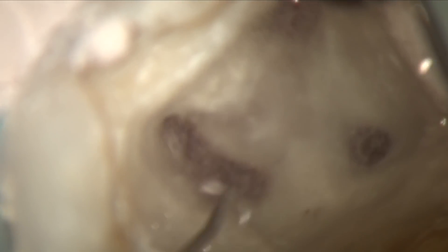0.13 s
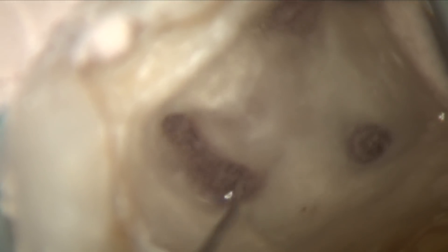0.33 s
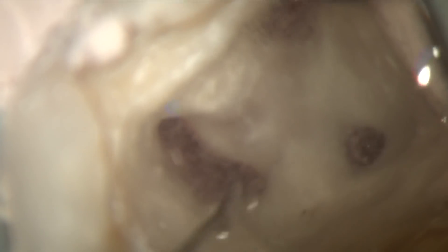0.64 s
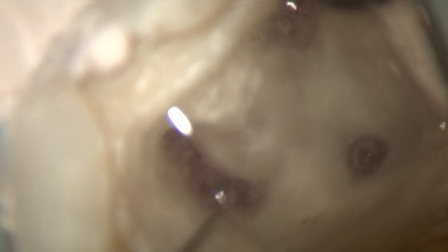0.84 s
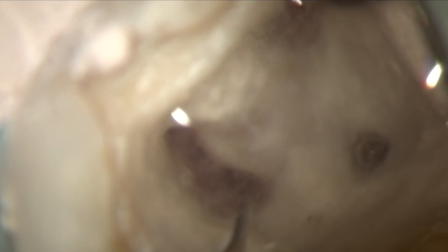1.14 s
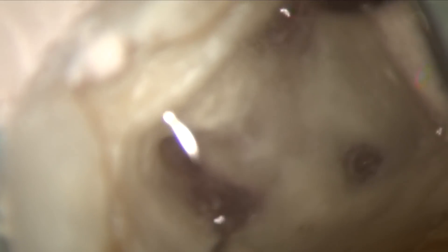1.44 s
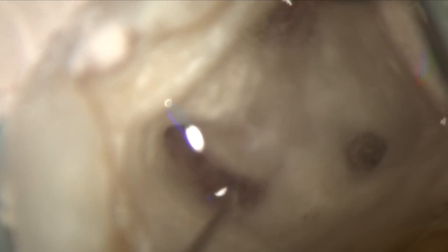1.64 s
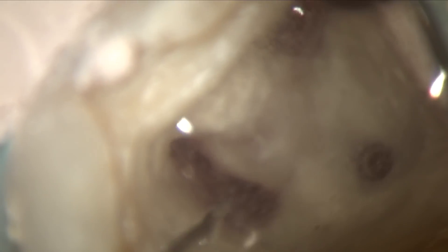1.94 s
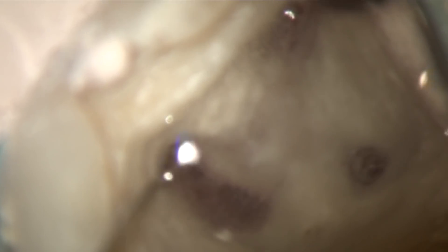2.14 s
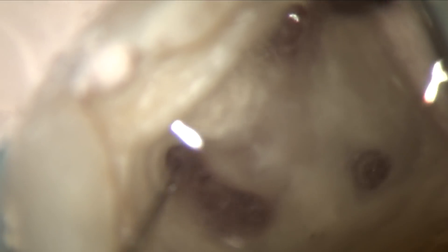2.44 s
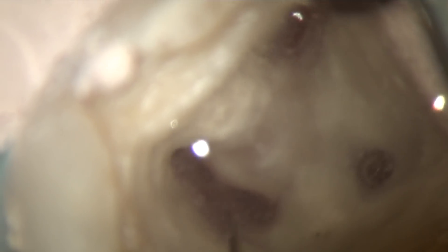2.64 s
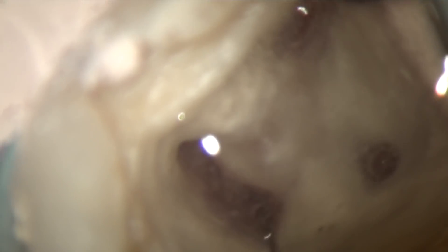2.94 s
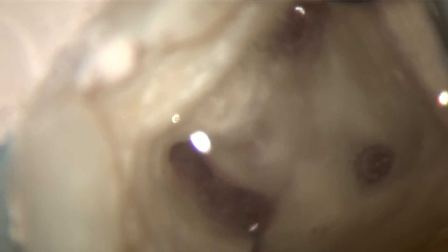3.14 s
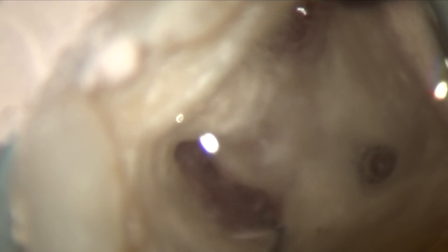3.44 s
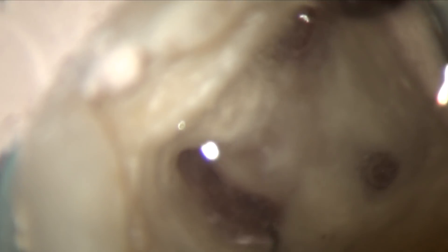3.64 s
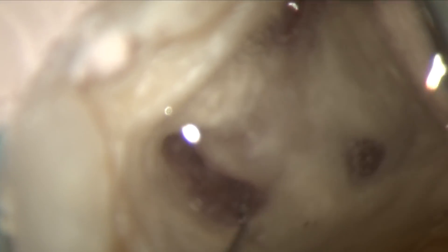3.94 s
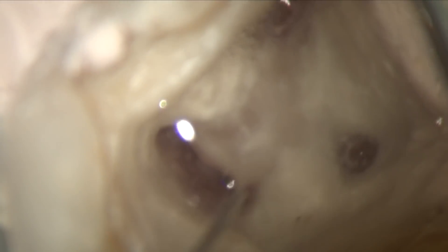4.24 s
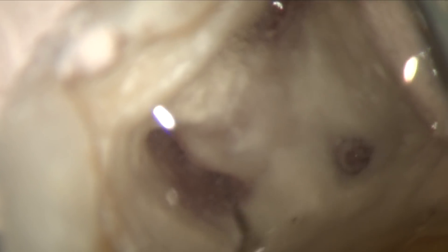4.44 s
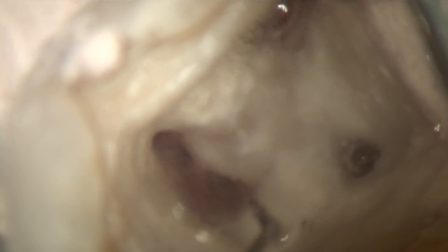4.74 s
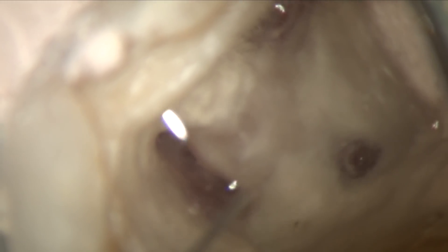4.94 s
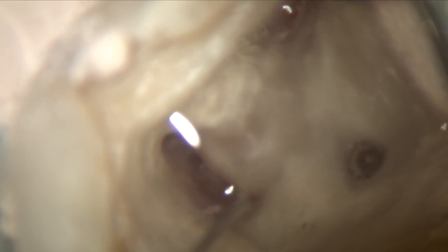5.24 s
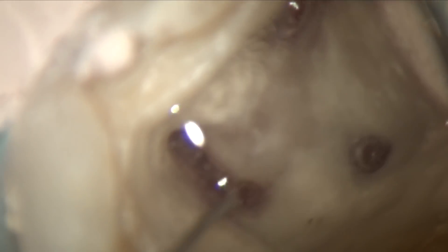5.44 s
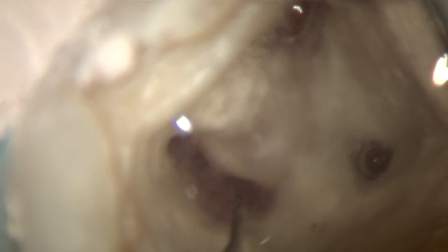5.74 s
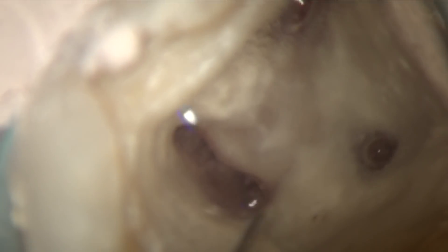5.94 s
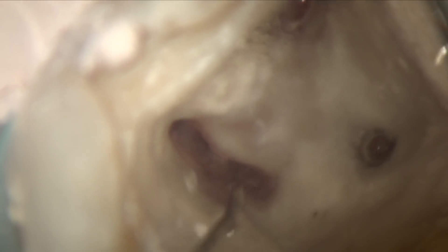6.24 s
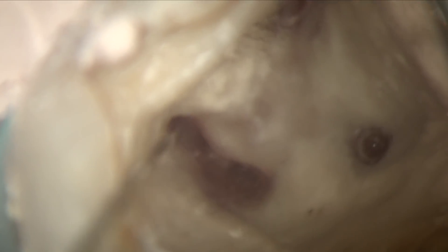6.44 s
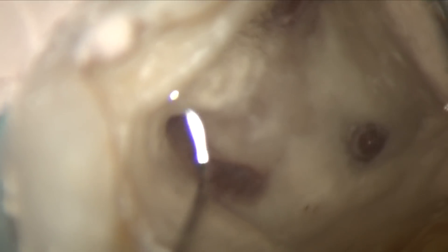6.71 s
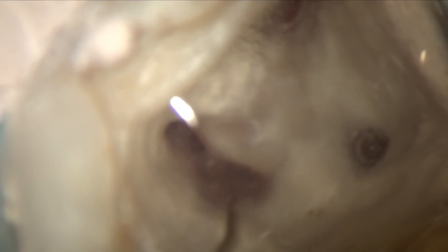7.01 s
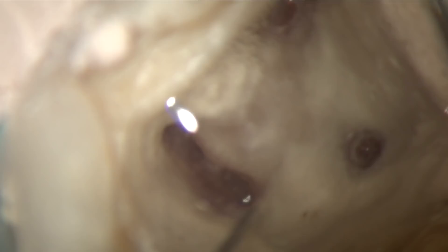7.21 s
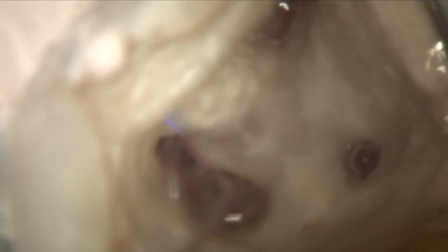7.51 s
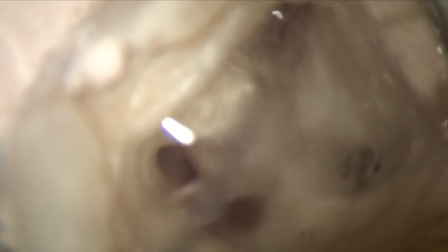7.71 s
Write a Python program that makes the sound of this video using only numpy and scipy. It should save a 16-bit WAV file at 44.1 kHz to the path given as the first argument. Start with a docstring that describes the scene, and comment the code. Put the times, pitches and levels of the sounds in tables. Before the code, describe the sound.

Steady bright suction hiss over faint pump whine, small wet rubs, a brief squeak, then a hard click that makes the level drop abruptly.

```python
"""A small treatment room: a thin suction tube draws air and a little liquid close to two microphones.
Jet noise at the tip excites the resonances of tube and cavity; a low rumble of air in the hose and
the faint sinusoids of a pump lie below it. Bursts of filtered noise make wet scuffs, gliding tones
low hums and a squeak, damped modes two dull bumps and one sharp tap.
The tap overloads the recorder, which steps its gain down and lets it creep back."""
import sys
import numpy as np
from scipy import signal
from scipy.fft import rfft, irfft
from scipy.io import wavfile

SR = 44100
rng = np.random.default_rng(int(sys.argv[2]) if len(sys.argv) > 2 else 0)


def pcm_store(signal):
    """Save signal as 16-bit PCM."""
    levels = np.round(np.clip(np.atleast_2d(signal), -1, 1) * 32767)
    wavfile.write(sys.argv[1], SR, levels.astype(np.int16).T)


def boost_factor(decibels):
    """Convert a level in decibels to a linear amplitude factor."""
    exponent = np.asarray(decibels, float) / 20
    return 10 ** exponent


N = 347067   # samples


def rms_one(x):
    """Normalisation: scale a signal to unit rms."""
    return x / np.sqrt(np.mean(x ** 2) + 1e-20)


def on_fft_grid(points):
    """Frequency response: interpolate (hz, db) points over log frequency at every FFT bin."""
    hz = np.maximum(np.fft.rfftfreq(N, 1 / SR), 1)
    point_hz, point_db = np.transpose(points)
    return np.interp(np.log(hz), np.log(point_hz), point_db)


def in_time(rows):
    """Envelope: interpolate every column after the first, which is time in s, at every sample."""
    s, *columns = np.transpose(rows)
    return [np.interp(np.arange(N) / SR, s, column) for column in columns]


def drift(rate_hz):
    """Slow random modulation of unit rms: white noise through two equal low-pass poles at rate_hz."""
    hop = 40   # samples between computed values
    r = np.exp(-2 * np.pi * rate_hz * hop / SR)
    white = rng.standard_normal(N // hop + 2002)
    slow = signal.lfilter([1], [1, -2 * r, r * r], white)[2000:]   # without the filter's start
    return np.interp(np.arange(N) / hop, np.arange(len(slow)), rms_one(slow))


def resonate(x, hz, width_hz):
    """Resonance: two equal band-pass sections, unit gain at the peak, give steep skirts and dark valleys."""
    r = np.exp(-np.pi * width_hz / SR)
    section = [(1 - r * r) / 2, 0, (r * r - 1) / 2, 1, -2 * r * np.cos(2 * np.pi * hz / SR), r * r]
    return signal.sosfilt([section, section], x)


def add_rub(out, start_s, length_s, hz, width_hz, level_db, fall=0):
    """Friction noise: adds a resonant, uneven burst; slowing its playback lowers the pitch."""
    spatter = rng.standard_normal(SR // 2) * boost_factor(3.5 * drift(70.0)[:SR // 2])   # wet and uneven
    rub = resonate(spatter, hz, width_hz)[::-1]
    i, n = int(start_s * SR), int(length_s * SR)
    position = np.cumsum(np.linspace(1 + fall / 2, 1 - fall / 2, n))
    rub = np.interp(position, np.arange(len(rub)), rub)
    out[i:i + n] += boost_factor(level_db) * rms_one(rub) * np.hanning(n) ** .5


def room():
    """Reverberation: response of the direct sound plus a dull, exponentially decaying tail of reflections."""
    tail_db, t60_s, wall_cut_hz = -16, 0.38, 1330   # tail energy against the direct sound
    t = np.arange(SR // 2) / SR
    pole = np.exp(-2 * np.pi * wall_cut_hz / SR)
    tail = signal.lfilter([1], [1, -pole], rng.standard_normal(len(t)))
    tail = tail * boost_factor(-60 * t / t60_s) * (t > .004)   # walls close by: the tail begins after 4 ms
    return 1 + boost_factor(tail_db) * rfft(tail / np.sqrt(np.sum(tail ** 2)), N)


def pump():
    """Periodic machine excitation: thin sinusoids carried along the hose, wavering in speed and strength."""
    # lines of the pump's whine: pitch_hz
    line_hz = [316, 632, 993, 1408, 1789, 1987]
    # their strengths: peak_db (against the hiss rms, before wavering)
    line_db = [-32, -41.5, -39, -40, -39, -37]
    out = 0
    for hz, level_db in zip(line_hz, line_db):
        phase = 2 * np.pi * np.cumsum(hz * (1 + .0012 * drift(2.9))) / SR
        out = out + boost_factor(level_db + 2.0 * drift(11.0)) * np.sin(phase)
    return out


def hose(lumpy_db):
    """Broadband flow noise: spectrally shaped noise rumbles in the hose, a little lumpy."""
    # spectrum of hose and room air: pitch_hz, density_db (relative, per Hz)
    rumble_spectrum = [(20, -36), (35, -16), (90, -18.5), (115, -6), (170, -6.5), (240, -3), (300, -4),
                       (420, -5), (900, -9), (1100, -11), (1900, -8), (2500, -53), (4200, -120)]
    rumble_db = -25   # against the hiss
    spectrum = rfft(rng.standard_normal(N)) * boost_factor(on_fft_grid(rumble_spectrum))
    return boost_factor(rumble_db + lumpy_db * drift(5.1)) * rms_one(irfft(spectrum, N))


def bumps():
    """Modal excitation: a soft contact makes a hollow body's modes ring roughly, with a puff of noise."""
    # dull bumps: start_s, strength_db, puff_hz, puff_db (rms before the puff's window)
    bump_rows = [(1.895, -24, 450, -39), (2.085, -31, 560, -36)]
    # modes of the hollow body: pitch_hz, level_db (relative), t60_s
    hollow_modes = [(127, -4, .4), (171, -10, .8), (230, -9, .4), (297, 0, .5), (500, -7, .35),
                    (670, -11, .3)]
    push_s, puff_s, puff_width = .05, .08, .6   # contact's rise; puff's length; width as share of its pitch
    out = np.zeros(N)
    for start_s, strength_db, puff_hz, puff_db in bump_rows:
        t = np.maximum(np.arange(N) / SR - start_s, 0)
        push = 1 - np.exp(-t / push_s)
        for hz, level_db, t60_s in hollow_modes:
            rattle_db = 3.5 * drift(30.0)
            decay = boost_factor(strength_db + level_db + rattle_db - 60 * t / t60_s)
            out += decay * push * np.sin(2 * np.pi * hz * t)
        add_rub(out, start_s, puff_s, puff_hz, puff_width * puff_hz, puff_db)
    return out


def squeaks():
    """Stick-slip oscillation: low hums and one squeak are drooping tones with an octave above."""
    # hums and squeak: start_s, length_s, first_hz, level_db (rms of the plain swell),
    # octave_db (against the fundamental at the swell's peak)
    squeak_rows = [(4.973, 0.17, 218, -45, -29), (5.11, 0.049, 880, -32.5, 0.5),
                   (5.426, .07, 247, -44, -25), (6.798, 0.29, 214, -40.5, -55)]
    droop_s = .008   # the shorter the sound, the further its pitch falls: share = droop_s / length_s
    out = np.zeros(N)
    for start_s, length_s, first_hz, level_db, octave_db in squeak_rows:
        i, n = int(start_s * SR), int(length_s * SR)
        progress = np.linspace(0, 1, n)
        waver = 1 + .03 * drift(90.0)[i:i + n]   # uneven slips
        glide = first_hz * (1 - droop_s / length_s * progress ** 2)   # holds, then droops
        phase = 2 * np.pi * np.cumsum(glide * waver) / SR
        swell = rms_one(progress * np.exp(-3.5 * progress) * (1 - progress) ** 0.27)   # rise, longer fade
        swell = swell * boost_factor(3.5 * drift(60.0)[i:i + n])   # the grip breaks up
        octave = boost_factor(octave_db) * swell / swell.max() * np.sin(2 * phase)
        out[i:i + n] += boost_factor(level_db) * swell * (np.sin(phase) + octave)
    return out


def scuffs():
    """Wet friction: a narrow noise body sinks in pitch under a broader, higher onset that ends sooner."""
    # soft scuffs nearby: start_s, length_s, body_hz, body_db, onset_db (both rms before the window)
    scuff_rows = [(0.58, 0.12, 450, -48, -35), (0.88, 0.086, 600, -45, -45.5),
                  (1.193, 0.11, 600, -31.5, -28), (3.652, 0.049, 700, -41, -32),
                  (3.777, 0.034, 564, -36, -39), (3.821, 0.087, 400, -36, -35), (4.382, .12, 300, -45, -44),
                  (4.858, .025, 600, -38, -38), (6.231, .09, 500, -39, -35), (6.388, 0.055, 600, -39, -48),
                  (6.51, .07, 280, -38, -53), (7.184, .05, 328, -36, -41)]
    body_width, body_fall = 0.46, .35   # shares of the body's pitch; it sinks as the cavity drains
    # shares of the body's pitch, the onset's pitch and the body's length
    onset_pitch, onset_width, onset_length = 2.2, 2.3, 0.82
    out = np.zeros(N)
    for start_s, length_s, hz, body_db, onset_db in scuff_rows:
        onset_hz = onset_pitch * hz
        add_rub(out, start_s, length_s, hz, body_width * hz, body_db, body_fall)
        add_rub(out, start_s, onset_length * length_s, onset_hz, onset_width * onset_hz, onset_db)
    return out


def tap():
    """Impact: the tip strikes something hard and excites heavily damped modes."""
    # modes of the strike: pitch_hz, level_db (relative), t60_s
    strike_modes = [(4600, 0, .002), (2900, -10, .003), (6500, -12, .002), (757, -47, .09)]
    start_s, peak_db = 5.8853, 4.8   # peak against full scale, before the channels' colour
    t = np.maximum(np.arange(N) / SR - start_s, 0)
    ring = 0
    for hz, level_db, t60_s in strike_modes:
        ring = ring + boost_factor(level_db - 60 * t / t60_s) * np.sin(2 * np.pi * hz * t)
    ring = ring * (1 - np.exp(-(t / .0004) ** 3))   # contact builds over a fraction of a millisecond
    return boost_factor(peak_db) * ring / np.abs(ring).max()


def jet(gust_db, own_db, bright_db):
    """Source-filter principle: turbulence excites resonances that flutter together and drift singly."""
    # resonances of tube and cavity: pitch_hz, width_hz (of one section), level_db (relative)
    tube_modes = [(1720, 300, -21), (2130, 120, -36), (2460, 418, -3.5), (2769, 383, -3), (3490, 160, -20),
                  (3756, 233, -3), (4056, 470, -2.5), (4825, 374, 1), (5070, 830, -2), (6324, 960, -7),
                  (6620, 570, -11.5), (7610, 720, -7), (9180, 1270, -14), (10370, 970, -13.5),
                  (11450, 1800, -11), (12000, 370, -12), (13700, 660, -11), (14100, 400, -17.5),
                  (15050, 900, -12.5), (15500, 700, -18)]
    # borders between the groups of resonances: pitch_hz
    group_borders = [3300, 5800, 8300]
    # how each group, low to high, follows the brightening: share
    bright_shares = [-0.27, 0.52, .8, 0.85]
    white, out = rng.standard_normal((2, N)), 0   # neighbouring resonances get unrelated noise
    flutter_db = gust_db * (drift(25.0) + 0.7 * drift(38.0))
    for k, (hz, width_hz, level_db) in enumerate(tube_modes):
        lift_db = bright_db * bright_shares[np.searchsorted(group_borders, hz)]
        gain = boost_factor(level_db + lift_db + own_db * drift(2.3))
        out = out + gain * resonate(white[k % 2], hz, width_hz)
    return rms_one(out) * boost_factor(flutter_db)


def scene():
    """Superposition: jet, hose and scuffs meet the room, the rest comes direct; channels differ in colour."""
    # suction and how far the tip is turned towards the microphones:
    # time_s, level_db (hiss, with small dips of the recorder's gain), bright_db (brightening)
    flow_rows = [(0.0, -14, -1), (.7, -13.5, -1), (1.1, -14.5, -1), (1.4, -15, 0.5), (1.78, -14, 0.5),
                 (2.0, -15, -0.7), (2.4, -14.5, 0), (2.65, -14.5, 1.5), (3.02, -14, 0), (3.17, -16, 0.7),
                 (3.85, -14, -.5), (4.02, -15, 0.6), (4.5, -13.5, 0.5), (4.95, -15, 0.6),
                 (5.37, -13.5, -.6), (5.75, -16, 0.8), (5.95, -14.5, 0.7), (6.6, -14, 1.5), (7.2, -14, 1.5),
                 (7.86, -14.5, 1)]
    # left minus right: pitch_hz, difference_db
    balance_points = [(40, -4), (100, -1), (210, 1), (330, 4), (500, 2), (1450, 2), (1600, -6),
                      (1950, -4.5), (2500, -5), (3000, -3.8), (4400, -4.5), (5000, -3), (7300, -3.5),
                      (8700, -5.5), (10000, -2.5), (11200, -2.1), (12000, 0.5)]
    level_db, bright_db = in_time(flow_rows)
    flow = boost_factor(level_db + .2 * drift(4.0))   # liquid passing makes the flow uneven
    suction = jet(gust_db=0.42, own_db=.5, bright_db=bright_db) + hose(lumpy_db=0.76)
    airborne = flow * suction + scuffs()
    direct = flow * pump() + squeaks() + bumps() + tap()
    spectrum = rfft(airborne) * room() + rfft(direct)
    pan = boost_factor(on_fft_grid(balance_points) / 2)
    sides = np.array([pan, 1 / pan]) * 2 / (pan + 1 / pan)   # the sum of both sides stays even
    return irfft(spectrum * sides, N)


def top_cut(x):
    """Nothing passes above the cut-off."""
    return signal.sosfilt(signal.butter(12, 16520, fs=SR, output="sos"), x)


def record(dry):
    """Gain control: dull self-noise joins, overload steps the gain down, then clipping and a low-pass."""
    noise_db, noise_hz = -66.5, 150   # rms before the gain; low-pass corner
    overload, step_db, creep_db_per_s, look_ahead_s = 1.45, -8, 2, .0335   # overload as amplitude
    dull = signal.butter(2, noise_hz, fs=SR, output="sos")
    self_noise = rms_one(signal.sosfilt(dull, rng.standard_normal(dry.shape)))
    x = dry + boost_factor(noise_db) * self_noise
    t, gain_db = np.arange(N) / SR, np.zeros(N)
    for hit_s in t[np.abs(x).max(axis=0) > overload]:
        since = t - hit_s + look_ahead_s   # the gain steps down slightly ahead of the overload
        gain_db = np.minimum(gain_db, np.where(since > 0, step_db + creep_db_per_s * since, 0))
    clipped = np.clip(x * boost_factor(gain_db), -.86, .86)
    band_limit = signal.ellip(14, .3, 75, 15700, fs=SR, output="sos")
    return top_cut(signal.sosfilt(band_limit, clipped))


dry = scene()
out = record(dry)
pcm_store(out)
```